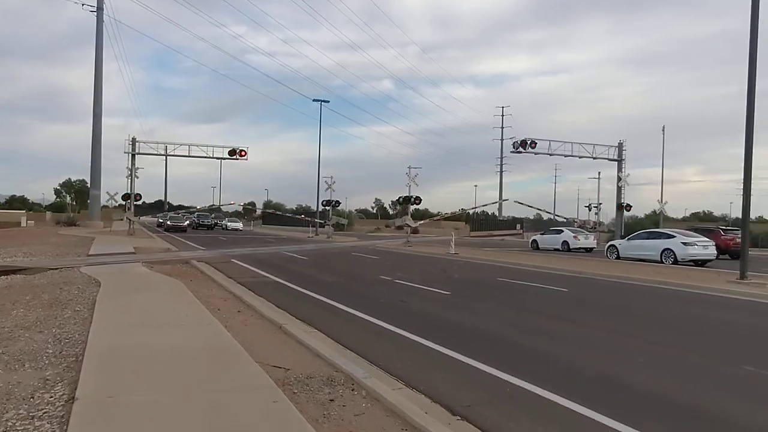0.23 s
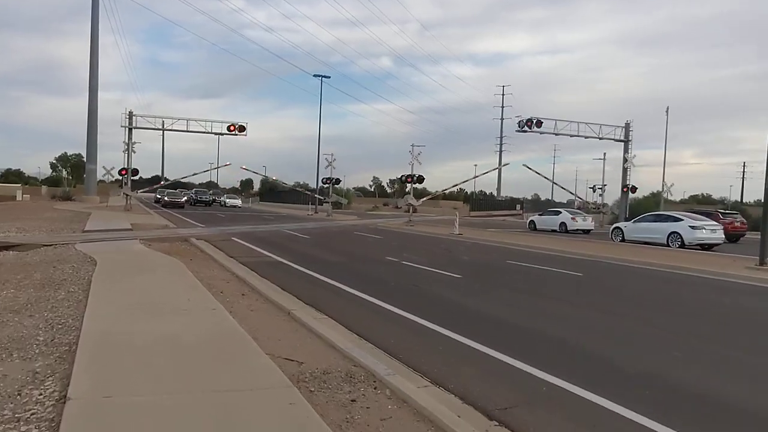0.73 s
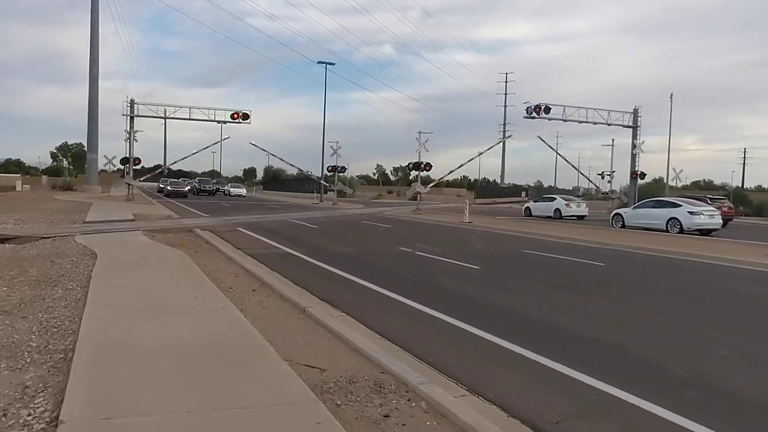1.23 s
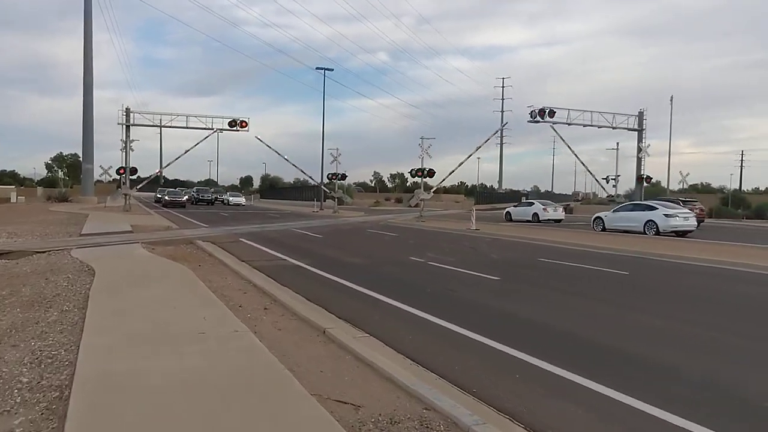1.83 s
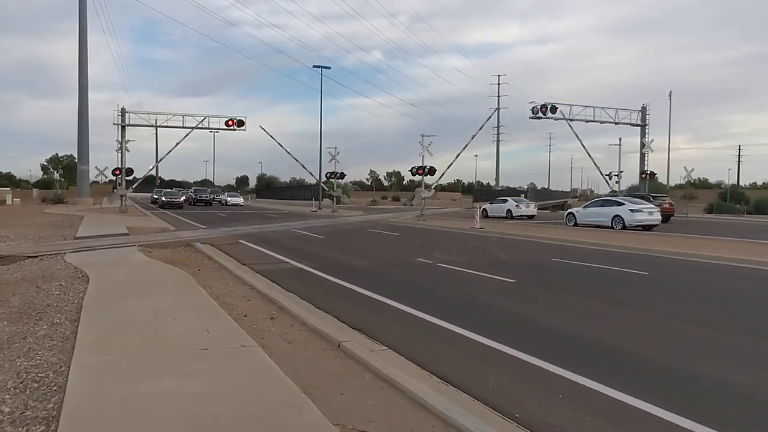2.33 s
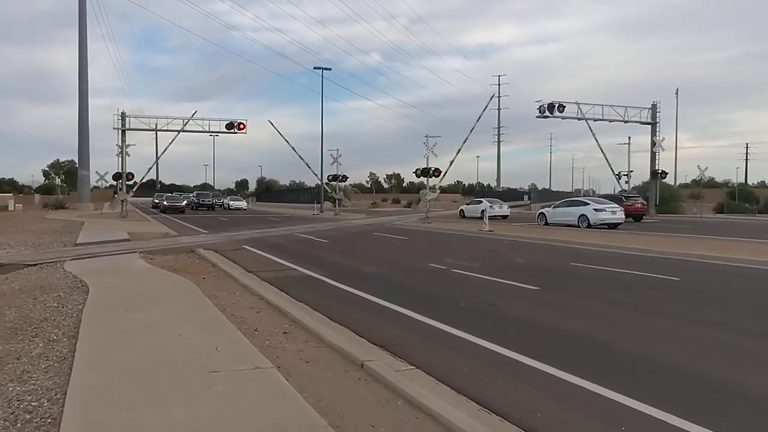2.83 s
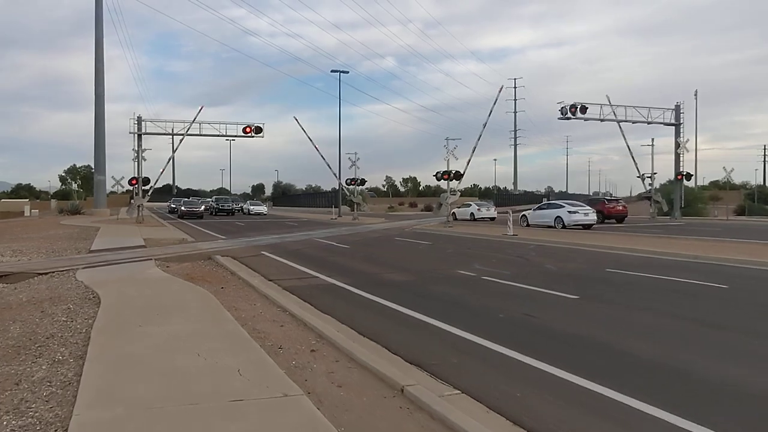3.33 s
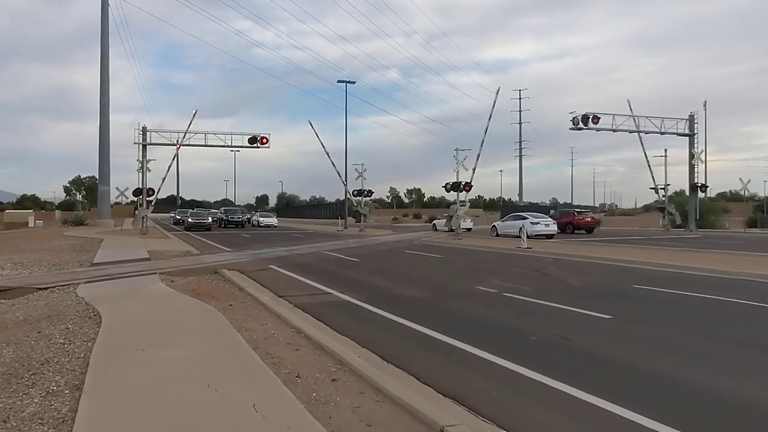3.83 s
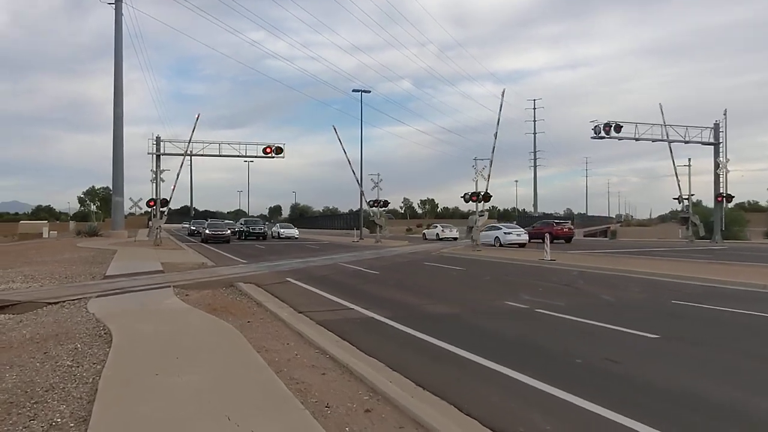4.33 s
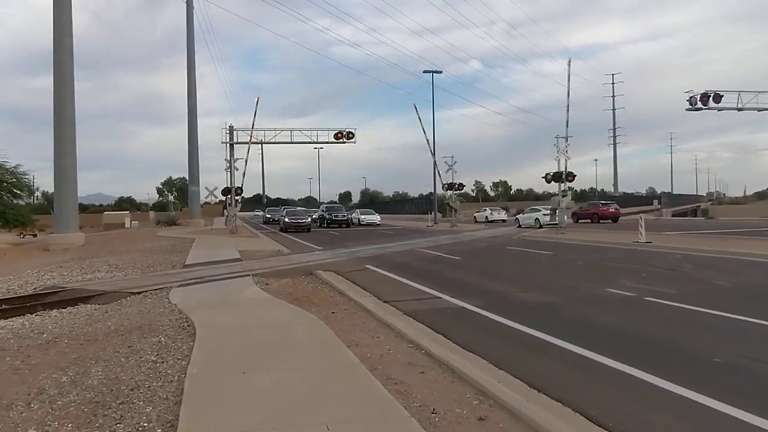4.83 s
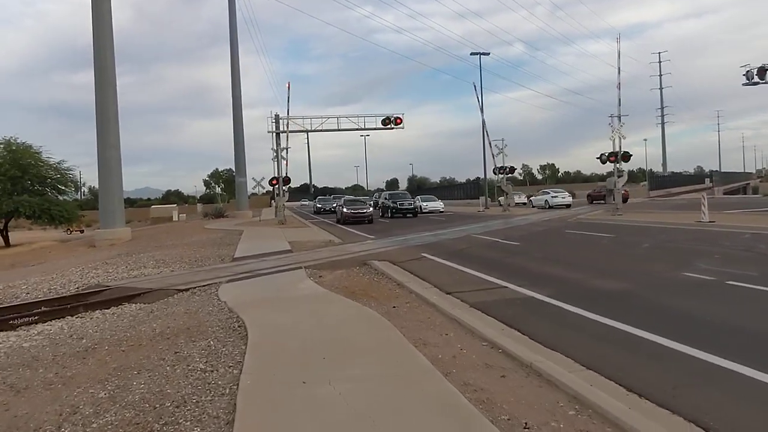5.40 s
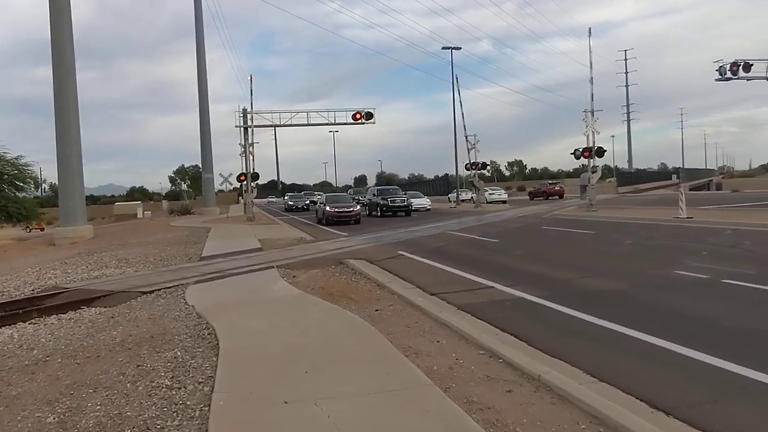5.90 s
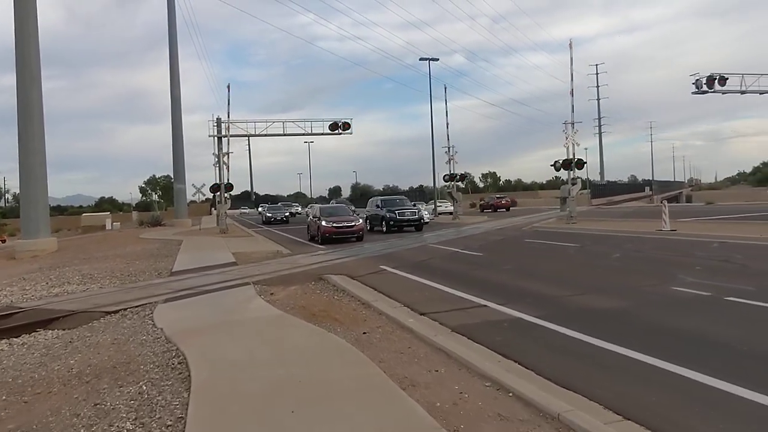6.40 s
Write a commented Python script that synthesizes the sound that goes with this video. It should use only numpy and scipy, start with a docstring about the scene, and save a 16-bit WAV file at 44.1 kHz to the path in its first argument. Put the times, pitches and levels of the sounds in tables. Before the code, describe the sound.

Open-air roadside at a level crossing, heard in wide stereo from the pavement. At first a car idles with a low, rough, quiet pulse over faint distant hiss and thin narrow drones; tiny grit clicks and scuffs are scattered through the first second. From about 0.4 seconds the engine picks up and its muffled, bassy exhaust note climbs steadily, with very faint bright ticking between 1.5 and 2.4. It swells to its loudest around 2.8 to 3.3 seconds, then drops in pitch and level at a gear shift near 3.5. From 4 it rises again, more quietly, peaking around 5.7 before another shift and fade. Meanwhile tyre roar and hiss from approaching cars grow, clearest after 4.7. Around 5.2 to 5.4 wheels clank over rail plates in a quick cluster of short metallic rattles, with one more at 5.95. Tyre rush continues to the end at 6.6.

```python
"""A car waiting at a level crossing idles, then pulls away: firing orders, uneven burning and ticks.
From the start, grit underfoot crackles in short noise bursts over a faint far hiss and two narrow drones.
The car shifts up near the middle and again near the end, the firing rate falling each time.
Meanwhile other cars roll closer, their tyres a growing roar and hiss of shaped noise; late on they clank
over the rail plates in rattles and ringing modes. Two spaced microphone ports listen from the pavement."""
import sys
import numpy as np
from scipy import signal
from scipy.fft import rfft, irfft, next_fast_len
from scipy.io import wavfile
from scipy.ndimage import uniform_filter1d, map_coordinates

SR = 44100
rng = np.random.default_rng(int(sys.argv[2]) if len(sys.argv) > 2 else 0)


def inscribe(sig):
    """Save sig as 16-bit PCM at rate SR to the path in sys.argv[1].

    A 1-D sig is mono; a 2-D sig holds one channel per row.
    Samples are clipped to [-1, 1] before scaling.
    """
    pcm = np.round(np.clip(np.atleast_2d(sig).T, -1, 1) * 32767)
    wavfile.write(sys.argv[1], SR, pcm.astype(np.int16))


N = 293470
TIME_S = np.arange(N) / SR

# exhaust note over time: time_s, firing_rate_hz, relative_level_db, brightness_db_per_octave_of_order
EXHAUST_COURSE = [(0.0, 28.22, -29.5, -8), (0.28, 27.31, -31, -7), (0.37, 30.4, -25.5, -6.0),
                  (0.59, 45.12, -21, -4.5), (0.74, 54.24, -22.0, -4.5), (0.96, 56.15, -23.5, 1.5),
                  (1.28, 60.24, -23, 2.5), (1.65, 64.65, -19, 1.5), (1.93, 71.3, -17, 3),
                  (2.31, 80.4, -15.5, 2.5), (2.6, 87.9, -13.0, 2.5), (2.83, 94.5, -8, 2.5),
                  (3.15, 101, -7, 2), (3.33, 93.4, -8, 3), (3.54, 83.9, -17, 2.5), (3.75, 79.95, -22, 3),
                  (3.95, 81.3, -18.0, 1.5), (4.2, 84.53, -18.5, 1.5), (4.8, 88.68, -18.5, 0.5),
                  (5.05, 90.84, -15.5, 0.0), (5.33, 94.3, -14, 1), (5.57, 96.5, -16, -0.5),
                  (5.72, 97.8, -12.5, -2.5), (5.91, 90.1, -15.5, -0.5), (6.09, 85.65, -20.5, -1.0),
                  (6.65, 86.63, -22.5, -4.5)]
# tail pipe, through which all orders leave: frequency_hz, gain_db
TAILPIPE_GAIN = [(28, -42), (45, -31), (60, -11.5), (80, -3), (100, -10), (120, -7), (145, 1.5),
                 (190, -5.5), (225, -14.5), (270, -28), (310, -25.5), (400, -37), (500, -44.5),
                 (600, -39.5), (700, -48.5), (850, -53), (1000, -60.5), (1200, -78)]
# colour shift as the car turns its tail this way and draws off: frequency_hz, gain_from_start_to_end_db
TURNING_GAIN = [(60, 8.5), (100, -1.5), (190, -0.5), (245, 4), (285, 15), (350, 8.5), (440, 17.5),
                (550, 10.5), (800, 17.5)]
# spectrum of the uneven burning: frequency_hz, relative_level_db
BURBLE_SPECTRUM = [(20, -35.5), (45, -8), (70, 2.5), (110, -0.5), (170, 0), (230, -3.5), (320, -12),
                   (500, -25.5), (900, -34), (2000, -69.5), (5000, -120)]
# bursts of bright ticks, one tick a firing: middle_s, level_db, half_length_s
TICK_BURSTS = [(1.53, -69, .07), (1.85, -62.5, .09), (2.13, -65.5, .08), (2.38, -68, .09)]
# spectrum of the ticks: frequency_hz, relative_level_db
TICK_SPECTRUM = [(3000, -31.0), (6500, -10.5), (8000, -3), (9500, -5), (11000, -19), (16000, -23.5)]
# clanks of wheels on the rail plates: start_s, relative_level_db, knock_re_rattle_db, time_to_fall_60_db_s
CLANK_EVENTS = [(5.213, -30, -11, 0.03), (5.218, -22, -3.5, 0.065), (5.281, -40, -16, 0.05),
                (5.35, -38, -10.5, 0.055), (5.395, -36, -0.5, .04), (5.95, -30.5, -6.5, 0.058)]
# spectrum of the rattling metal: frequency_hz, relative_level_db
METAL_SPECTRUM = [(600, -32), (1300, 10.5), (2200, -1.5), (3000, 1), (4000, -7), (5400, -3), (6500, -10.5),
                  (8400, -1), (10500, -17), (12000, -13), (14000, -11), (15700, -26)]
# modes of the rail plate: pitch_hz, relative_level_db, time_to_fall_60_db_s
PLATE_MODES = [(735.5, 2.5, 0.11), (1318, 1, 0.057), (2150, -5, 0.084), (4050, -17, 0.1), (5540, -14, .06)]
# scuffs and clicks of grit, and small rattles: middle_s, level_db, centre_hz, spread_octaves, half_length_s
GRIT_EVENTS = [(.115, -58.5, 5500, 0.33, .0014), (.294, -56, 3570, 0.35, .002),
               (0.323, -61, 6220, 0.41, 0.016), (.381, -45, 2800, .33, 0.0011),
               (.382, -54, 8002, .67, 0.00083), (.613, -56.5, 4200, 0.59, 0.0035),
               (.717, -57, 5800, 0.45, 0.0022), (.828, -63.5, 7450, .3, .011), (.837, -55, 4200, .25, 0.01),
               (.935, -65.5, 6420, .6, .015), (1.372, -61.5, 6460, 0.42, 0.016),
               (2.93, -57, 5800, 0.38, 0.011), (3.048, -56, 3460, 0.19, 0.008),
               (3.869, -55.5, 13500, .25, .003), (3.977, -58.5, 6000, .8, .003),
               (4.143, -54, 3970, .4, 0.055), (4.36, -57, 4000, .44, 0.067), (4.958, -51, 6300, 0.16, .003),
               (5.244, -36.5, 2200, 0.57, 0.015), (5.286, -48, 5400, .045, 0.0046),
               (5.31, -57, 5400, .045, 0.0073), (5.332, -49.5, 3270, .4, 0.073),
               (5.363, -52, 3820, 0.041, .02)]
# approach of the other cars: time_s, relative_tyre_roar_db, relative_tread_hiss_db
TRAFFIC_COURSE = [(0, -43.5, -86), (1.41, -43.5, -75.5), (1.9, -42.5, -65.5), (3.6, -41, -63.5),
                  (3.9, -39.5, -59), (4.72, -37.5, -57), (5.2, -35, -53.5), (6.65, -35, -50)]
# spectrum of the tyre roar: frequency_hz, relative_density_db
ROAR_SPECTRUM = [(100, -32.5), (250, 0.5), (450, -3), (780, 2.5), (1000, 0), (1300, -2), (1800, -6.5),
                 (2500, -13), (3200, -20.5), (5000, -33.5), (7000, -58), (11000, -120)]
# spectrum of the tread hiss: frequency_hz, relative_density_db
HISS_SPECTRUM = [(2500, -39.5), (3800, 1.5), (4700, -1), (5500, -2), (6300, -8.5), (8300, -1), (9200, -4),
                 (10700, -18), (13600, -11.5), (15700, -19.5)]
# spectrum of the far hiss: frequency_hz, relative_density_db
FAR_HISS_SPECTRUM = [(3000, -10.5), (5000, -4.5), (8000, -0.5), (10000, -8.5), (13500, -4), (15700, -1.5)]
# narrow bands that hang in the roar: centre_hz, width_of_each_resonance_hz, mean_level_db
DRONE_BANDS = [(1836, 52, -54.5), (2373, 140, -56.5)]
# likeness of left and right: frequency_hz, correlation_0_to_1
COHERENCE = [(60, 1), (300, .91), (700, .88), (1400, .56), (3000, .26), (8000, .5), (15000, .42)]
# level difference of the ports: frequency_hz, left_minus_right_db
PORT_DIFFERENCE = [(60, -0.5), (99, 0.5), (160, 1), (270, 1.5), (450, 2), (740, -1.5), (1220, -1),
                   (2010, -6), (3330, -8), (5500, 4), (9080, -8), (15000, 9.5)]
# phase difference of the ports: frequency_hz, left_lead_radians
PORT_LEAD = [(30, -.2), (100, -.06), (200, -.1), (400, -.35), (780, -1.2), (2150, -2), (4650, -4),
             (7300, .5), (11000, 4.5), (15500, .5)]

TOP_HZ = 15750  # band limit
WAVER_DB, WAVER_GROWS_DB = .3, .22  # slow unsteadiness of an order, and its growth per order
IDLE_HZ, IDLE_ROUGH = 30, 6  # at this firing rate and below, this much is added to a phase wander of 1
BURBLE_DB, BURBLE_FOLLOWS = -26.5, 0.26  # base level; dB per dB of the note
TICK_FLOOR_DB = -83.5  # ticks between the bursts


def amp(db):
    """A level in decibels is twenty times the logarithm of an amplitude."""
    return 10 ** (np.asarray(db) / 20)


def unit(x):
    """Division by the root mean square brings a signal to unit effective value."""
    return x / np.sqrt(np.mean(x ** 2) + 1e-20)


def along(points, hz):
    """Interpolation on a logarithmic frequency axis, as in hearing."""
    f, v = np.transpose(points)
    return np.interp(np.log(hz + 1), np.log(f + 1), v)


def curves(rows):
    """Linear interpolation in time gives one value per sample for each column after the time."""
    s, *columns = np.transpose(rows)
    return [np.interp(TIME_S, s, c) for c in columns]


def wobble(rate):
    """Random fluctuation: a smooth curve through rate random knots a second."""
    knots = rng.standard_normal(int(N * rate / SR) + 4)
    return map_coordinates(knots, [np.arange(N) * rate / SR])


def filtered(x, response):
    """Linear filtering: the spectrum is multiplied by a complex response of frequency."""
    m = next_fast_len(N + SR // 2)
    return irfft(rfft(x, m) * response(np.fft.rfftfreq(m, 1 / SR)), m)[..., :N]


def coloured(x, spectrum):
    """Spectral shaping: a gain curve in decibels weights each frequency."""
    return filtered(x, lambda hz: amp(along(spectrum, hz)))


def noise(patchy_db):
    """Nonstationary noise: two unrelated noises share random gains in patches of time and frequency."""
    z = signal.stft(rng.standard_normal((2, N + 512)), nperseg=512)[2]
    field = uniform_filter1d(rng.standard_normal(z.shape[1:]), 6, 0)
    field = uniform_filter1d(field, 12, 1)
    return signal.istft(z * amp(patchy_db * unit(field)), nperseg=512)[1][:, :N]


def spread(pair):
    """Partial coherence: two unrelated sounds are mixed into left and right with a set correlation."""
    def response(hz):
        turn = np.arccos(np.clip(along(COHERENCE, hz), -1, 1)) / 2
        return np.array([np.cos(turn), np.sin(turn)])

    mid, side = filtered(pair, response)
    return np.array([mid + side, mid - side])


def firing_orders(hz, turns, level_db, bright_db):
    """Periodic excitation: regular firings give a harmonic series, coloured by the tail pipe."""
    rough = 1 + IDLE_ROUGH * np.minimum(IDLE_HZ / hz, 1) ** 5
    note = 0
    for k in range(1, 13):
        db = level_db + along(TAILPIPE_GAIN, k * hz)
        db = db + along(TURNING_GAIN, k * hz) * np.arange(N) / N
        db = db + bright_db * np.log2(k / 2)
        db = db + (WAVER_DB + WAVER_GROWS_DB * k) * wobble(9) + 0.2 * k * wobble(25)
        # near-aligned peaks make a sharp puff; low orders lag most, high ones wander most
        lag = 1.35 / k ** 1.6
        wander = rough * (.1 + .008 * k ** 2) * wobble(20)
        note = note + np.sqrt(2) * amp(db) * np.cos(k * 2 * np.pi * turns - lag + wander)
    return note


def burble(turns, level_db):
    """Amplitude modulation: noise of uneven burning swells with every firing."""
    gate = ((1 + np.cos(2 * np.pi * turns)) / 2) ** 0.32
    flow = coloured((.5 + gate) * noise(patchy_db=.8), BURBLE_SPECTRUM)
    return spread(amp(BURBLE_DB + BURBLE_FOLLOWS * level_db) * unit(flow))


def ticks(hz, turns):
    """Impulsive excitation: every firing starts a decaying grain of noise of random size."""
    sizes = amp(1.2 * rng.standard_normal(int(turns[-1]) + 2))[turns.astype(int)]
    since_firing_s = (turns % 1) / hz
    grains = sizes * np.exp(-since_firing_s / .0009) * np.sign(rng.standard_normal(N))
    bursts = amp(TICK_FLOOR_DB)
    for s, db, half in TICK_BURSTS:
        bursts = bursts + amp(db) * np.exp(-((TIME_S - s) / half) ** 2 / 2)
    # the root of the rate keeps the power even as firings crowd together
    return bursts * unit(coloured(grains / np.sqrt(hz), TICK_SPECTRUM))


def engine():
    """Superposition: orders, burble and ticks share one phase, the integral of the firing rate."""
    hz, level_db, bright_db = curves(EXHAUST_COURSE)
    turns = np.cumsum(hz * (1 + 0.0019 * wobble(30))) / SR
    note = firing_orders(hz, turns, level_db, bright_db)
    return note + ticks(hz, turns) + burble(turns, level_db)


def clanks():
    """Impact and resonance: each jolt rattles metal as decaying noise and rings the plate's modes."""
    t = np.arange(SR // 4) / SR
    rattle, ring = np.zeros((2, N + SR)), np.zeros(N + SR)
    for s, db, knock_db, length in CLANK_EVENTS:
        at = round(s * SR)
        envelope = amp(db - 60 * t / length) * (1 - np.exp(-t / 0.00093))
        rattle[:, at:at + len(t)] += envelope * rng.standard_normal((2, len(t)))
        modes = 0
        for hz, level, t60 in PLATE_MODES:
            mode_db = level + rng.normal(0, 1) - 60 * t / t60
            modes = modes + amp(mode_db) * np.sin(2 * np.pi * hz * t)
        swell = (1 - np.exp(-t / .02)) ** 2  # the plate answers late
        ring[at:at + len(t)] += amp(db + knock_db) * swell * modes
    metal = amp(3) * coloured(rattle[:, :N], METAL_SPECTRUM)
    # the rattle leans 5 dB to the right, the ring is central
    return amp([[-2.5], [2.5]]) * spread(metal) + amp(18.5) * ring[:N]


def grit():
    """Band-limited bursts: each scuff is a swell of crackling noise around its own pitch."""
    half_window = 8192
    out, t = np.zeros((2, N + SR)), np.arange(-half_window, half_window) / SR
    octave = np.log2(np.fft.rfftfreq(len(t), 1 / SR) + 1)
    for s, db, hz, octaves, half in GRIT_EVENTS:
        grains = amp(3 * rng.standard_normal(len(t) // 32).repeat(32))  # a new gain every 32 samples
        crackle = rng.standard_normal((2, len(t))) * grains
        weight = np.exp(-((octave - np.log2(hz)) / octaves) ** 2 / 2)
        band = unit(irfft(rfft(crackle) * weight))
        at = round(s * SR)
        out[:, at:at + len(t)] += amp(db) * np.exp(-(t / half) ** 2 / 2) * band
    return spread(out[:, half_window:half_window + N])


def tyres():
    """Broadband rolling noise: tyre roar and tread hiss grow as the cars come near."""
    roar_db, hiss_db = curves(TRAFFIC_COURSE)
    swell = wobble(2.2)
    roar = unit(coloured(noise(patchy_db=1.1), ROAR_SPECTRUM))
    hiss = unit(coloured(noise(patchy_db=.6), HISS_SPECTRUM))
    return amp(roar_db + 2.5 + 0.25 * swell) * roar + amp(hiss_db - 2.5 + 0.24 * swell) * hiss


def drones():
    """Resonance: noise through two equal band-pass stages hangs as a narrow, wavering band."""
    out = 0
    for centre, width, db in DRONE_BANDS:
        def response(f):
            return (1j * f * width / (centre * centre - f * f + 1j * f * width)) ** 2

        band = unit(filtered(noise(patchy_db=2.0), response))
        out = out + amp(db + 1.2 * wobble(9)) * band
    return out


def far_hiss():
    """Diffuse background: a faint patchy noise of fixed mean level fills the treble."""
    return amp(-66) * unit(coloured(noise(patchy_db=1.5), [(1500, -60), *FAR_HISS_SPECTRUM]))


def scene():
    """Superposition: the pressures of all sources add."""
    return engine() + clanks() + grit() + spread(tyres() + drones() + far_hiss())


def record(dry):
    """Interaural-like differences: the ports differ in level and phase, up to a sharp band limit."""
    side = np.array([[.5], [-.5]])  # half of each difference to either port

    def response(hz):
        gain = amp(side * along(PORT_DIFFERENCE, hz))
        return gain * np.exp(1j * side * along(PORT_LEAD, hz)) * (hz < TOP_HZ)

    return filtered(dry, response)


dry = scene()
out = record(dry)
inscribe(out)
```